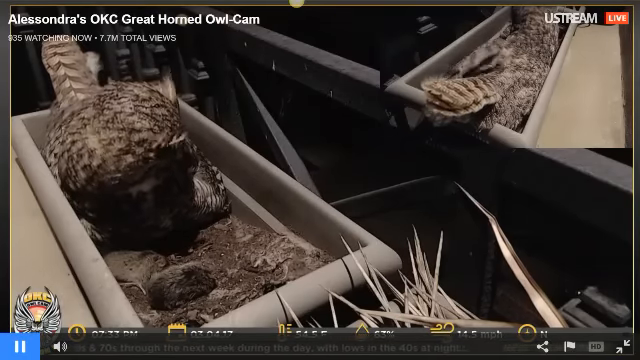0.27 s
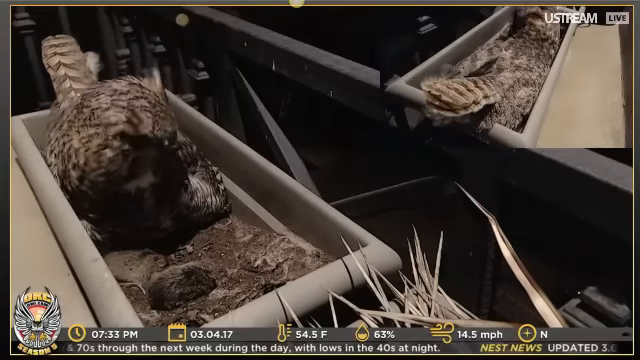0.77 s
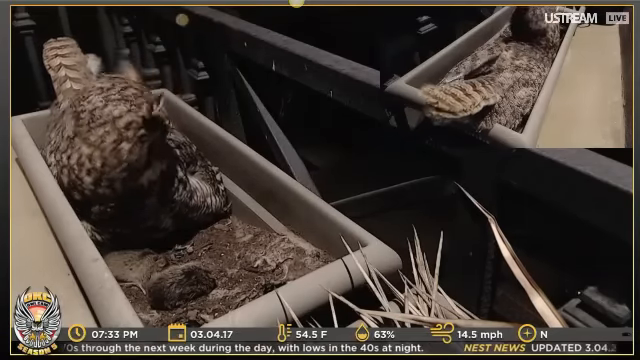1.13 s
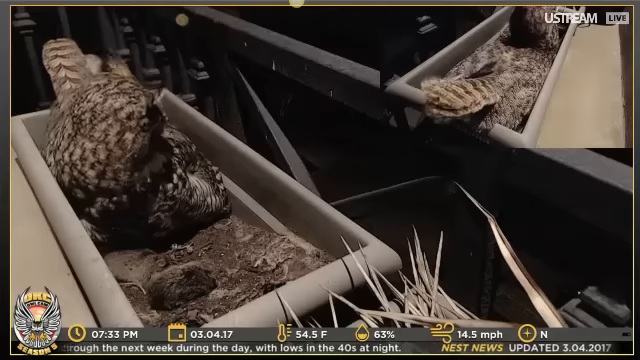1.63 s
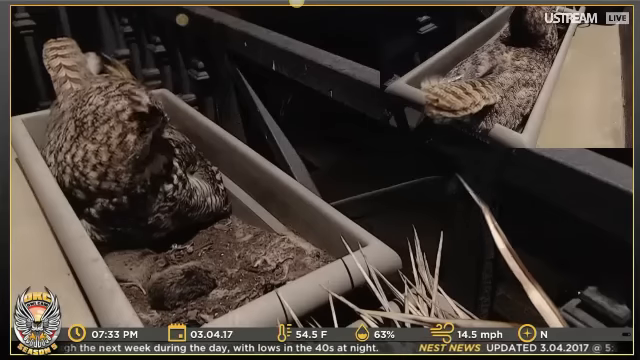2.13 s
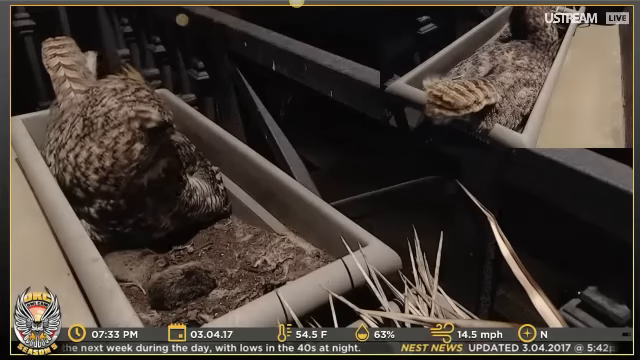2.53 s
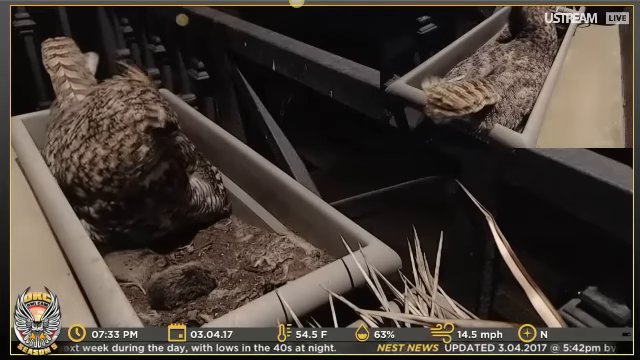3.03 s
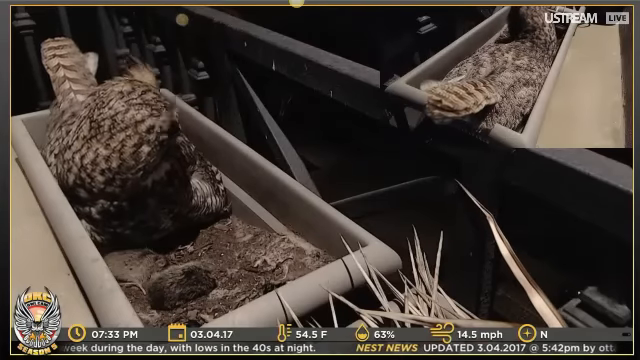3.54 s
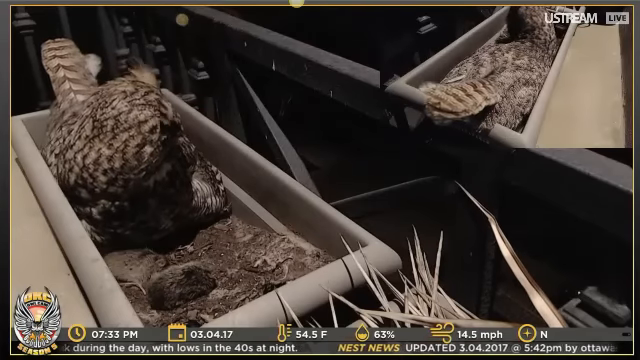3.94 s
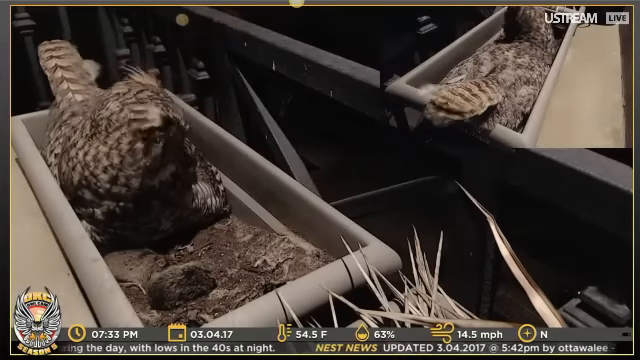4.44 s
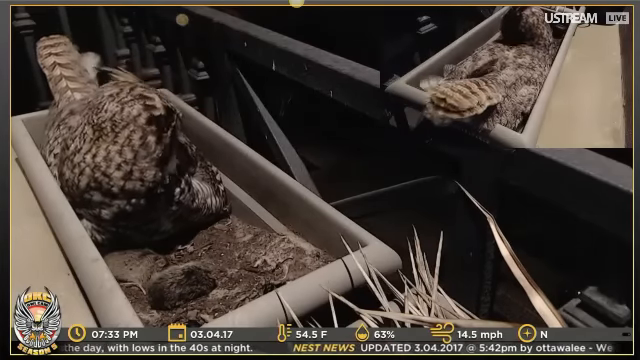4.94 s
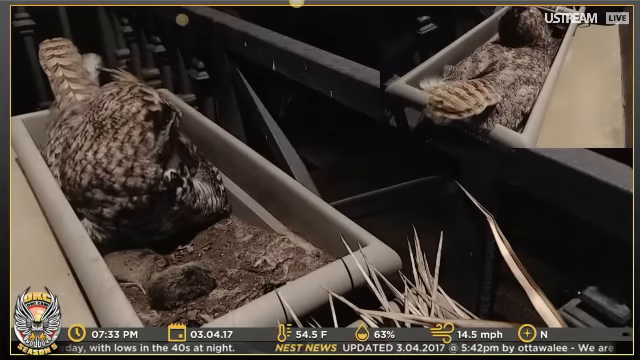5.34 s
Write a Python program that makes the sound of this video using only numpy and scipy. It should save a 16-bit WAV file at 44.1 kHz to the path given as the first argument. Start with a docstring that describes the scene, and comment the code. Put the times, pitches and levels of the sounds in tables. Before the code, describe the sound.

Outdoors at night, far roads make a steady low rumble under a faint hiss of tyres and wind. A nearby owl hoots once, long and low, then twice more. Some dry plant stalks crackle quietly on the right, and then the owl goes into a string of louder, clipped hoots mixed with little grunts. The close microphones give a slightly narrow sound with little deep bass or treble.

```python
"""Owl on its nest at night

An owl gives three long low hoots, then a run of short ones with soft grunts between, all almost pure
tones from its swollen throat. Far traffic rumbles, tyres hiss in swells, wind stirs the plants and a car
swishes past. Thin tones ring out far off; dry stalks rustle and snap to the right.
Two close microphones hear it with little bass and hardly any top."""
import sys
import numpy as np
from scipy import signal
from scipy.io import wavfile

SR = 44100
rng = np.random.default_rng(int(sys.argv[2]) if len(sys.argv) > 2 else 0)


def int16_out(signal):
    """Quantize to a 16-bit WAV file."""
    q = np.round(np.clip(np.atleast_2d(signal).T, -1, 1) * 32767)
    wavfile.write(sys.argv[1], SR, q.astype(np.int16))


N = 246519
T = np.arange(N) / SR

# The lower resonances of a dry stalk, rubbed or snapped. Each row: pitch in Hz, width in Hz, gain in dB.
STALK_BODY = [(2300, 700, -6), (3150, 700, -5), (4000, 600, 0), (4650, 500, 0)]


def from_db(db):
    return 10 ** (np.asarray(db) / 20)


def rms_one(x):
    return x / np.sqrt(np.mean(x ** 2) + 1e-20)


def in_time(rows):
    """One curve per column from breakpoints whose first column is seconds."""
    s, *columns = np.transpose(rows)
    return [np.interp(T, s, column) for column in columns]


def at_hz(points, hz):
    """Read a curve along a logarithmic frequency axis."""
    points_hz, values = np.transpose(points)
    return np.interp(np.log(hz), np.log(points_hz), values)


def butter(x, order, hz, kind="low"):
    return signal.sosfilt(signal.butter(order, hz, kind, fs=SR, output="sos"), x)


def drift(rate_hz):
    """A smooth random wander with a spread of 1."""
    pole = np.exp(-80 * np.pi * rate_hz / SR)
    slow = signal.lfilter([1], [1, -2 * pole, pole * pole], rng.standard_normal(N // 40 + 2002))[2000:]
    return np.interp(np.arange(N) / 40, np.arange(len(slow)), rms_one(slow))


def swell(peak_s, rise_s, fall_s):
    """A smooth swell of height 1, at half height rise_s before its peak and fall_s after."""
    return 1 / (1 + ((T - peak_s) / np.where(T < peak_s, rise_s, fall_s)) ** 2)


def late(x, lag_s):
    return np.interp(T - lag_s, T, x, left=0)


def place(x, pan_db, left_lag_s=0, right_lag_s=0):
    """One source at two microphones; a negative pan leans right."""
    return np.array([from_db(pan_db / 2) * late(x, left_lag_s),
                     from_db(-pan_db / 2) * late(x, right_lag_s)])


def resonances(x, modes):
    """Parallel resonances with alternating signs. Each mode: pitch in Hz, width in Hz, gain in dB."""
    out = 0
    for k, (hz, width_hz, db) in enumerate(modes):
        r = np.exp(-np.pi * width_hz / SR)
        b = (1 - r * r) / 2 * np.array([1, 0, -1])
        a = [1, -2 * r * np.cos(2 * np.pi * hz / SR), r * r]
        out = out + (-1) ** k * from_db(db) * signal.lfilter(b, a, x)
    return out


def throat(hz):
    """The closed beak and swollen throat pass an almost pure tone with a faint octave."""
    phase = 2 * np.pi * np.cumsum(hz) / SR + rng.uniform(0, 2 * np.pi)
    return np.sin(phase) + from_db(-40) * np.sin(2 * phase)


def long_hoots():
    """Pitch scoops up, arches and sags; level opens, settles and swells once more before the stop."""
    # Each row: start and end in seconds, top pitch in Hz, sag's lead on the end in seconds, sag depth
    # in Hz, opening, held and closing levels in dB, release in seconds.
    hoots = [(-.06, 0.381, 287.5, 0.062, 18.3, -34, -37, -32, 0.014),
             (1.221, 1.582, 286.3, 0.045, 42, -34, -37.5, -35.5, 0.032),
             (1.905, 2.233, 290.7, 0.043, 43, -35.5, -39, -34, 0.037)]
    scoop_hz, scoop_s, arch_hz, sag_s = 46.9, 0.026, 9.9, 0.012
    attack_s, settle_s, push_rise_s, push_lead_s = 0.027, 0.11, 0.087, 0.076
    waver_hz, waver_db = 1.6, 1.4
    out = 0
    for start, end, top_hz, sag_lead_s, sag_hz, open_db, held_db, push_db, release_s in hoots:
        since, until = np.maximum(T - start, 0), np.maximum(end - T, 0)
        scoop = scoop_hz * np.exp(-since / scoop_s)
        sag = sag_hz / 2 * (1 + np.tanh((sag_lead_s - until) / (2 * sag_s)))
        arch = arch_hz * ((since - until) / (since + until)) ** 2
        hz = top_hz - scoop - sag - arch + waver_hz * drift(14.3)
        push_s = end - push_lead_s
        db = np.interp(T, [start + attack_s, start + settle_s, push_s - push_rise_s, push_s, end],
                       [open_db, held_db, held_db, push_db, push_db - 1.5])
        fade_in = np.sin(np.pi / 2 * np.minimum(since / attack_s, 1)) ** 2
        fade_out = np.sin(np.pi / 2 * np.minimum(until / release_s, 1)) ** 2
        level = np.sqrt(2) * from_db(db + waver_db * drift(25))
        out = out + level * fade_in * fade_out * throat(hz)
    return out


def nest(calls):
    """Nearby walls echo the owl's calls weakly and the hollow around the nest rings."""
    # Wall reflections. Each row: delay in seconds, gain in dB.
    walls = [(0.019, -28.5), (0.043, -24.5), (0.108, -22)]
    # The ring of the hollow. Each row: pitch in Hz, width in Hz, gain in dB.
    hollow = [(287, 6, -10)]
    softened = butter(calls, 4, hz=900)   # a low-pass, so the calls start and stop without clicks
    echoes = sum(from_db(db) * late(softened, delay_s) for delay_s, db in walls)
    return place(softened + echoes + resonances(softened, hollow), pan_db=-0.6, right_lag_s=0.00014)


def banded_noise(spectrum, flicker_db, flicker_hz, right_lag_s=0, deep_db=0):
    """A stereo bed of third-octave noise bands, each flickering on its own; its mono mix has rms 1."""
    # Stereo width. Each row: frequency in Hz, left-right correlation from -1 to 1.
    likeness = [(60, .99), (230, .985), (450, .95), (900, .75), (1500, .45), (2000, -.3), (3300, .4),
                (4400, .3), (5500, -.3), (7000, -.3)]
    # Stereo lean. Each row: frequency in Hz, left minus right in dB.
    balance = [(60, -4), (100, 1.5), (170, 0), (290, -0.5), (490, -2.5), (820, -4), (1390, -2.5),
               (2350, -3), (3970, -0.5), (6710, 1)]
    out, run_in, left_right = 0, SR // 4, np.array([[1], [-1]])
    low_hz, high_hz = spectrum[1][0] * 0.8, spectrum[-2][0] * 1.25
    edges = np.geomspace(low_hz, high_hz, round(3 * np.log2(high_hz / low_hz)) + 1)
    white = rng.standard_normal((2, 2, N + run_in))
    for k, (low, high) in enumerate(zip(edges, edges[1:])):
        mid, side = butter(white[k % 2], 2, [low, high], "band")[:, run_in:]
        hz = np.sqrt(low * high)
        alike = at_hz(likeness, hz)
        band = np.sqrt(1 + alike) * mid + np.sqrt(1 - alike) * side * left_right
        deep_share = np.clip(2 * np.log2(200 / hz), 0, 1)   # fades in over the half octave below 200 Hz
        gain = from_db(at_hz(spectrum, hz) + flicker_db * drift(flicker_hz) + deep_db * deep_share)
        pan = from_db(at_hz(balance, hz) / 2 * left_right)
        out = out + gain * pan * band
    out = np.array([out[0], late(out[1], right_lag_s)])
    return out / np.sqrt(np.mean(out.mean(axis=0) ** 2))


def traffic_rumble():
    """The low rumble of far roads heaves gently."""
    # Rumble colour. Each row: frequency in Hz, relative noise density in dB.
    spectrum = [(47, -50), (80, -11), (124, 1), (177, -5.5), (226, 2), (311, -8), (344, -10), (450, -23),
                (580, -46), (990, -120)]
    # Level ride. Each row: time in seconds, level in dB, tilt towards the deep bass in dB.
    ride = [(0, -45.5, 0.5), (.34, -42, -3.5), (.64, -44, -3), (1.42, -48, 0.5), (1.71, -43.5, -1.5),
            (2.12, -46, 0), (2.4, -44.5, 3), (3.0, -45.5, 0.5), (3.47, -43, 1), (3.8, -46.5, 1.5),
            (4.09, -44.5, -0.5), (4.6, -45, 0.5), (4.86, -45.5, 2.5), (5.59, -44, -2)]
    level_db, deep_db = in_time(ride)
    rumble = banded_noise(spectrum, flicker_db=1.67, flicker_hz=23, right_lag_s=0.00018, deep_db=deep_db)
    return from_db(level_db) * rumble


def far_cars():
    """Passing cars add their power to a steady tyre hiss; the road's roar swells less with them."""
    # Each row: closest moment in seconds, hiss level in dB, approach and departure in seconds.
    passes = [(-.05, -70.5, .2, 0.38), (2.302, -78, 0.22, 0.14), (3.779, -71.5, 0.4, 0.77),
              (5.6, -74, 0.45, 0.22)]
    # Midrange road roar. Each row: frequency in Hz, relative noise density in dB.
    roar_spectrum = [(210, -32), (350, -8), (444, -6.5), (539, -6), (577, -8), (1020, -17.5), (1130, -19),
                     (1250, -31.5), (1500, -38.5), (1950, -55), (3300, -120)]
    # Tyre hiss. Each row: frequency in Hz, relative noise density in dB.
    tyre_spectrum = [(760, -27.5), (1300, -0.5), (1590, -2.5), (2150, 0.5), (3300, -2), (3570, -6),
                     (4180, -15.5), (4600, -11), (5980, -43), (10100, -120)]
    hiss_db, roar_db, roar_follows = -74.5, -60.5, 0.41
    car_power = sum((from_db(db - hiss_db) * swell(s, rise_s, fall_s)) ** 2
                    for s, db, rise_s, fall_s in passes)
    lift_db = 10 * np.log10(1 + car_power)
    roar = banded_noise(roar_spectrum, flicker_db=1.5, flicker_hz=9, right_lag_s=0.00013)
    hiss = banded_noise(tyre_spectrum, flicker_db=1.38, flicker_hz=24)
    return from_db(roar_db + roar_follows * lift_db) * roar + from_db(hiss_db + lift_db) * hiss


def wind():
    """Faint gusts hiss high in the plants."""
    # Wind colour. Each row: frequency in Hz, relative noise density in dB.
    spectrum = [(2590, -24.5), (4400, -0.5), (6340, -0.5), (7160, -9.5), (9310, -48), (15800, -120)]
    # Each row: time in seconds, level in dB.
    gusts = [(0, -80.5), (.64, -81.5), (1.25, -85.5), (1.93, -85), (2.35, -80), (2.55, -91), (2.66, -87),
             (2.8, -88), (3.11, -85.5), (4.86, -84), (5.2, -81.5), (5.59, -77.5)]
    return from_db(in_time(gusts)[0]) * banded_noise(spectrum, flicker_db=2, flicker_hz=8.9)


def thin_tones():
    """Far squeals, each a wavering sine in a blur of narrow noise; the first slides onto its pitch."""
    # Each row: pitch in Hz, opening downward glide in Hz, share of blur, level curve as pairs of
    # seconds and dB.
    squeals = [(3212, 110, .45, [(.47, -90), (.49, -68), (.515, -67), (.535, -62), (.56, -67), (.645, -68),
               (.662, -74), (.69, -69), (.73, -71), (.76, -82), (.82, -77), (.88, -78), (.92, -86),
               (1.1, -95)]), (4370, 0, .9, [(.665, -95), (.685, -81), (.72, -82), (.76, -98)])]
    blur_hz, glide_s, waver_hz, flutter_db = 90, 0.012, 17, 1.8
    out = 0
    for hz, glide_hz, blur_share, curve in squeals:
        start, end = curve[0][0], curve[-1][0]
        band = [(hz, blur_hz, 0)]
        blur = rms_one(resonances(resonances(rng.standard_normal((2, N)), band), band))
        glide = glide_hz * np.exp(-np.maximum(T - start, 0) / glide_s)
        tone = np.sin(2 * np.pi * np.cumsum(hz + glide + waver_hz * drift(25)) / SR)
        level = from_db(in_time(curve)[0] + flutter_db * drift(25)) * (T > start) * (T < end)
        out = out + level * (tone + blur_share * blur)
    return out


def stalk_rubs():
    """Dry stalks rub in bursts of dense, uneven clicks that ring in short resonances."""
    # Each row: time of full level in seconds, level in dB, hold in seconds, relative levels of body
    # and of squeak in dB.
    rubs = [(1.866, -77, .005, -2, 1.5), (2.105, -78, .005, -8, -7.5), (2.16, -83.5, 0.02, -11, -7),
            (2.207, -71, 0.034, -1.5, -14), (2.248, -68, 0.06, -5, -1), (2.309, -66, 0.02, 3.5, -2),
            (2.34, -73, .008, -9, -4), (2.385, -76, .022, -8, 0), (2.41, -69, 0.018, -6, 4),
            (2.45, -79, .02, -6, 2), (2.503, -75, 0.006, -3, -4), (2.535, -76, .025, -7, -2),
            (2.585, -78, 0.01, -6, 0), (2.68, -79, .008, -4, -4), (2.705, -66.5, .006, 1, -6),
            (2.72, -70.5, 0.008, -9, 2), (4.44, -84, 0.022, 2.5, -14), (4.58, -75, 0.028, -5, -10)]
    # The stalks' bright ring. Each row: pitch in Hz, width in Hz, gain in dB.
    bright_modes = [(5000, 470, -10), (5520, 330, 2), (6300, 730, -2), (7000, 1200, -7)]
    # One stiff stalk that sings when rubbed. Each row: pitch in Hz, width in Hz, gain in dB.
    squeak_mode = [(5470, 230, 0)]
    clicks_per_s, rise_db_per_s, fall_db_per_s = 2600, 1200, 600
    sizes = from_db(3.3 * np.minimum(rng.exponential(1, N), 4)) * rng.choice([-1, 1], (2, N))
    hits = rng.random((2, N)) < clicks_per_s / SR
    grains = hits * sizes * from_db(2.2 * drift(55)) + 1e-18
    bright = rms_one(resonances(grains[0], bright_modes))
    body = rms_one(resonances(grains[1], STALK_BODY))
    squeak = rms_one(resonances(resonances(grains[0], squeak_mode), squeak_mode))
    out = 0
    for s, db, hold_s, body_db, squeak_db in rubs:
        fade_db = rise_db_per_s * np.maximum(s - T, 0) + fall_db_per_s * np.maximum(T - s - hold_s, 0)
        rustle = bright + from_db(body_db) * body + from_db(squeak_db) * squeak
        out = out + from_db(db - np.minimum(fade_db, 200)) * rustle
    return out


def stalk_snaps():
    """Each break is one click: a dry crack, then the stalk rings briefly."""
    # Each row: time in seconds, rough peak level in dB, relative level of the body in dB.
    snaps = [(2.1, -62, -8), (2.177, -58, -6), (2.2046, -40.5, -9.5), (2.2102, -55, -2), (2.228, -47, -10),
             (2.2443, -62, -9), (2.253, -55, -1), (2.315, -61, -13), (2.348, -57, -15), (2.416, -53, -3),
             (2.494, -61, 3), (2.537, -57, 0), (2.6734, -62, -12), (2.687, -61, -2), (2.699, -54.5, -9),
             (2.7085, -64, -4), (2.729, -61, -13)]
    # The shorter bright ring of a breaking stalk. Each row: pitch in Hz, width in Hz, gain in dB.
    bright_modes = [(5020, 660, -4), (5700, 1330, 0.5)]
    makeup_db, crack_db = 24.5, -21   # makeup: a stalk rings far below the click that excites it
    s, db, body_db = np.transpose(snaps)
    clicks = np.full((2, N), 1e-18)
    clicks[:, np.round(s * SR).astype(int)] = from_db(makeup_db + np.array([db, db + body_db]))
    crack = from_db(crack_db) * np.diff(clicks[0], prepend=0)
    return crack + resonances(clicks[0], bright_modes) + resonances(clicks[1], STALK_BODY)


def nest_box(stalks):
    """The stalks sit to the right; the box throws each click back a few milliseconds later."""
    # Each row: left delay in seconds, right delay in seconds, gain in dB.
    reflections = [(.0023, .0026, -10), (.0047, .0039, -11), (.0081, .0104, -13)]
    echoes = sum(from_db(db) * place(stalks, 0, left_s, right_s) for left_s, right_s, db in reflections)
    return place(stalks, pan_db=-6.5, left_lag_s=0.001) + echoes


def short_hoots():
    """Each hoot or grunt is a puff of air: the tone swells and sinks, breath escapes towards its end."""
    # Each row: start in seconds, peak level of the tone in dB, pitch in Hz, length in seconds.
    puffs = [(3.458, -27.5, 242, 0.02), (3.86, -23, 265.3, 0.045), (3.905, -37, 209, 0.018),
             (4.23, -25, 260, 0.042), (4.273, -33.5, 256, 0.019), (4.352, -39, 228, 0.013),
             (4.531, -23.5, 264, 0.046), (4.579, -30.5, 257.7, 0.018), (4.649, -36, 210, 0.023),
             (4.81, -36.5, 206, 0.028), (4.841, -21, 267.4, 0.046), (4.936, -27.5, 241.6, 0.031),
             (4.966, -34, 177, 0.023), (5.126, -37.5, 205, 0.035), (5.232, -22.5, 266.9, 0.049),
             (5.279, -31, 185.4, 0.013)]
    # Throat resonances that colour the breath. Each row: pitch in Hz, width in Hz, gain in dB.
    throat_modes = [(302, 130, -8.5), (411, 47, -2)]
    pitch_fall = 0.08
    air = rms_one(resonances(rng.standard_normal(N), throat_modes))
    out = np.zeros(N)
    for start, db, hz, length_s in puffs:
        progress = np.arange(round(length_s * SR)) / (length_s * SR)
        span = round(start * SR) + np.arange(len(progress))
        skew = 0.42 + 18.4 * length_s   # longer puffs peak later
        blunt_swell = np.sin(np.pi * progress ** skew) ** 0.55
        tone = blunt_swell * throat(hz * (1 + pitch_fall * (0.4 - progress ** 2)))
        breath_db = -14.5 - 2.56 * max(db + 29, 0)   # above -29 dB, louder puffs are clearer
        breath = from_db(breath_db) * np.sin(np.pi * progress ** 1.7) * air[span]
        out[span] += from_db(db) * (tone + breath)
    return out


def car_swish():
    """One car passes with a brighter swish: a smooth swell of band noise."""
    # The swish's colour. Each row: centre in Hz, width in Hz, gain in dB.
    band = [(4280, 430, 0)]
    air = resonances(resonances(rng.standard_normal((2, N)), band), band)
    air = rms_one(butter(air, 8, hz=4400))
    return from_db(-76.5) * swell(peak_s=3.72, rise_s=0.23, fall_s=0.25) * air


def scene():
    """The owl up close, over a bed of roads and wind, with small sounds around it."""
    owl = nest(long_hoots() + short_hoots())
    night_bed = traffic_rumble() + far_cars() + wind() + car_swish()
    stalks = nest_box(stalk_rubs() + stalk_snaps())
    return owl + night_bed + stalks + thin_tones()


def record(dry):
    """Narrow-band microphones, a faint amplifier hiss with a bass murmur, then a steep top cut."""
    bass_cut_hz, top_hz, cutoff_hz = 99, 7600, 15700
    narrow = butter(dry, 9, bass_cut_hz, "high")
    narrow = signal.sosfilt(signal.cheby2(10, 45, top_hz, fs=SR, output="sos"), narrow)
    leak = from_db(-26) * butter(dry, 6, top_hz, "high")   # a little of the top gets past
    hiss = from_db(-95) * (rng.standard_normal(N) + rng.standard_normal((2, N)))
    murmur = from_db(-85.5) * rms_one(butter(hiss, 2, hz=90))
    top_cut = signal.ellip(12, 0.5, 70, cutoff_hz, fs=SR, output="sos")
    return signal.sosfilt(top_cut, narrow + leak + hiss + murmur)


dry = scene()
out = record(dry)
int16_out(out)
```